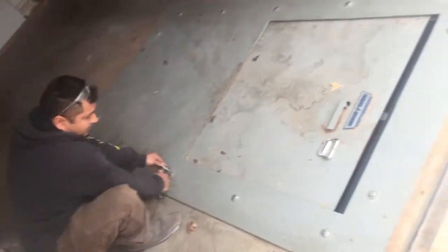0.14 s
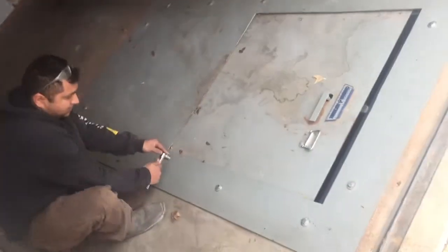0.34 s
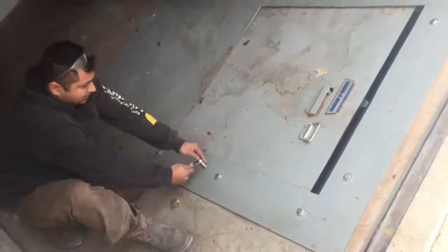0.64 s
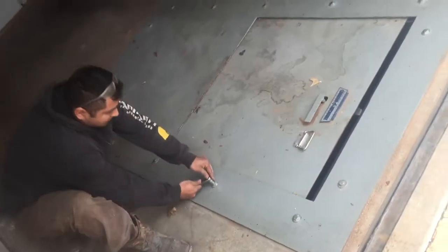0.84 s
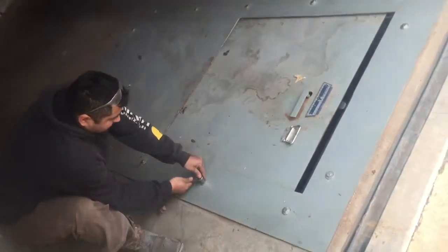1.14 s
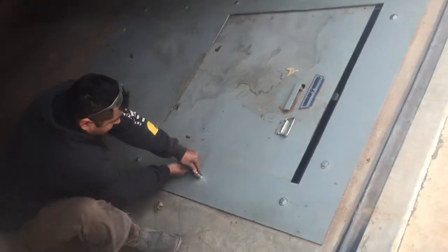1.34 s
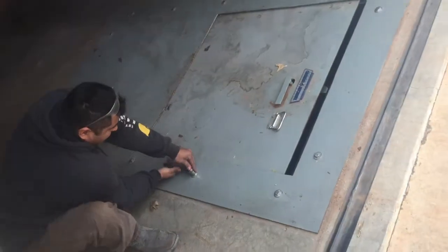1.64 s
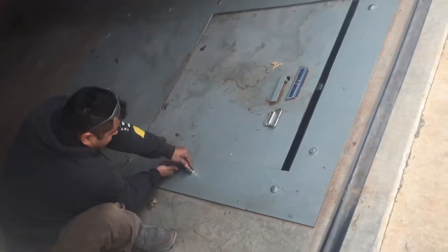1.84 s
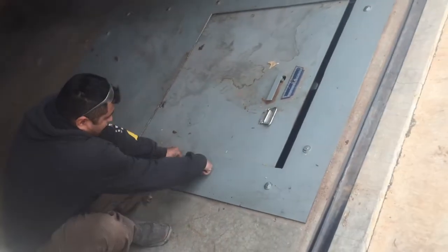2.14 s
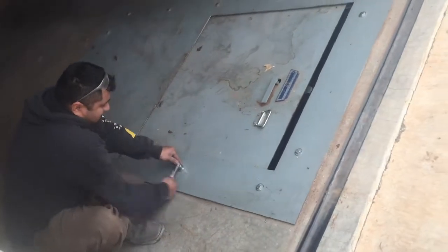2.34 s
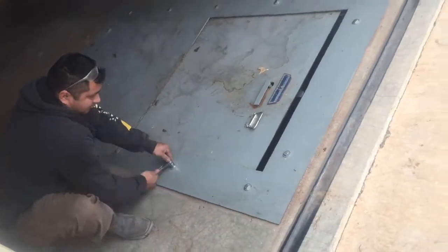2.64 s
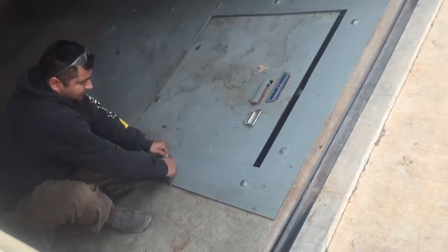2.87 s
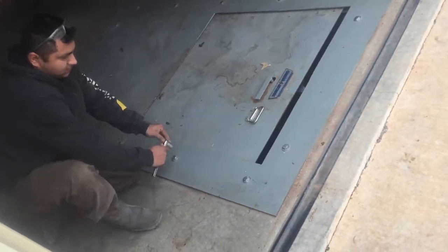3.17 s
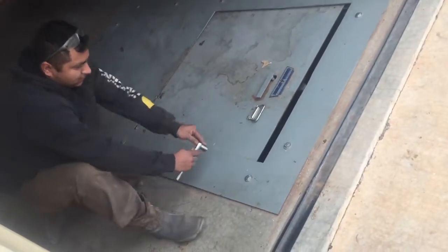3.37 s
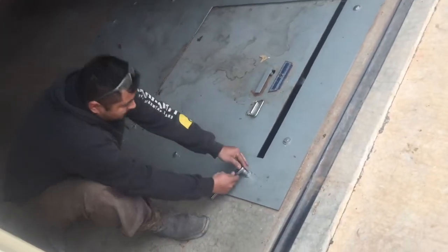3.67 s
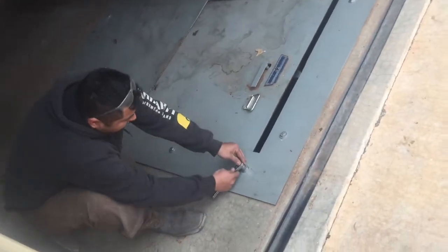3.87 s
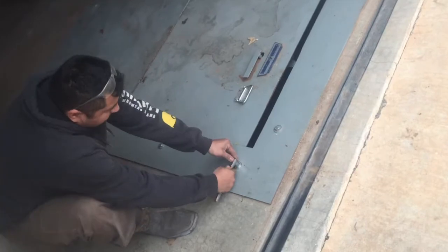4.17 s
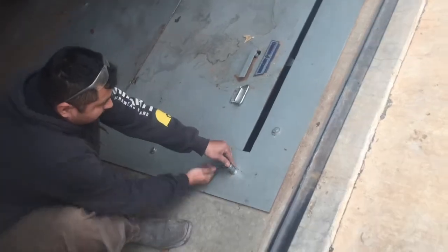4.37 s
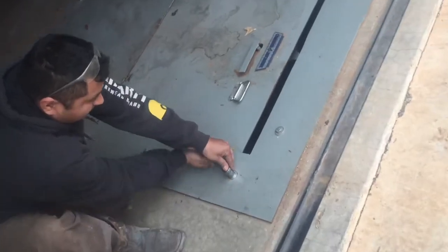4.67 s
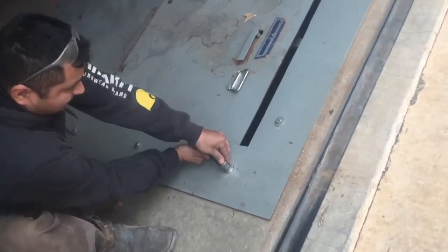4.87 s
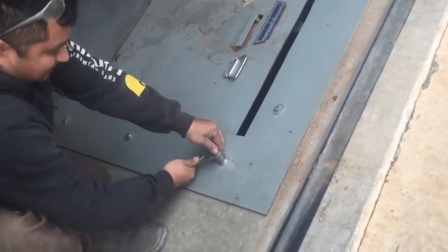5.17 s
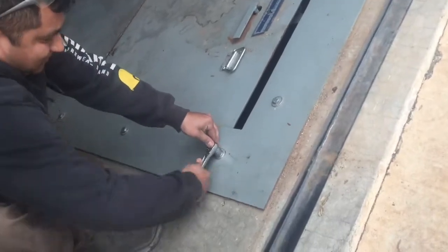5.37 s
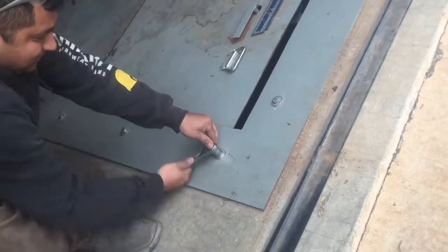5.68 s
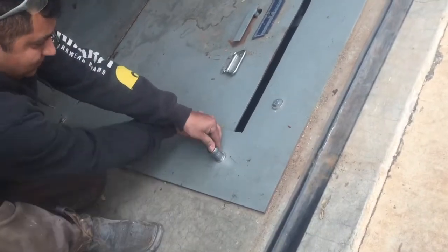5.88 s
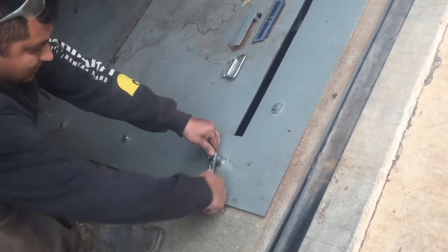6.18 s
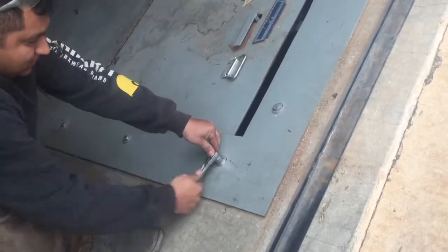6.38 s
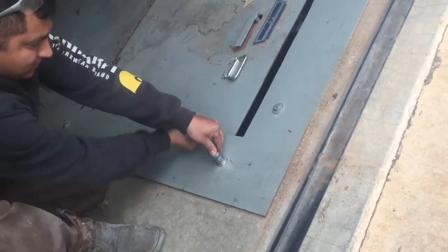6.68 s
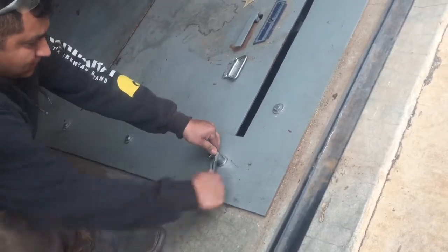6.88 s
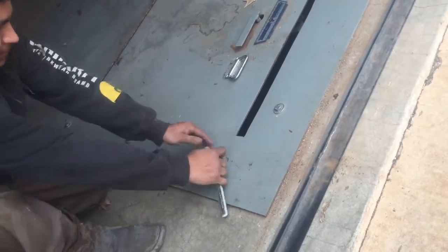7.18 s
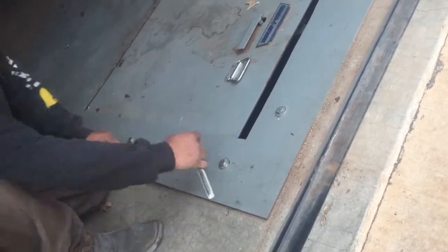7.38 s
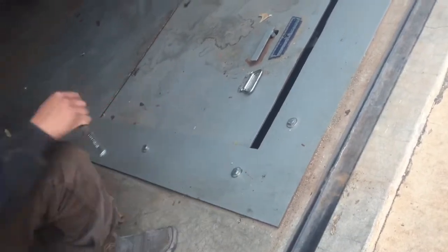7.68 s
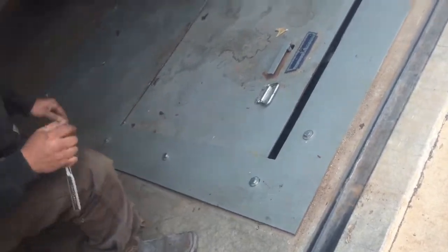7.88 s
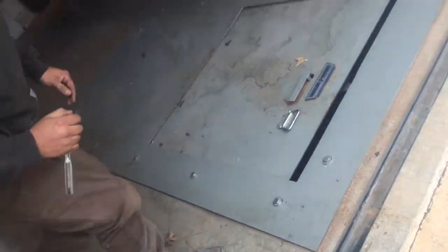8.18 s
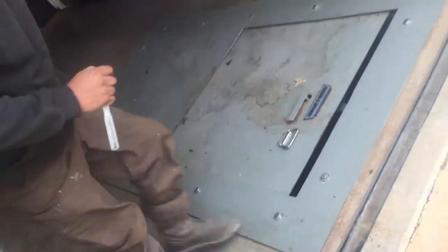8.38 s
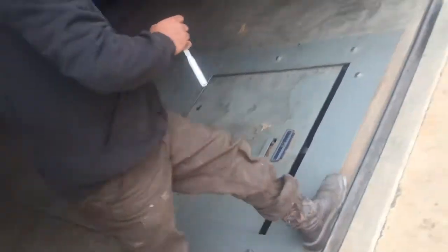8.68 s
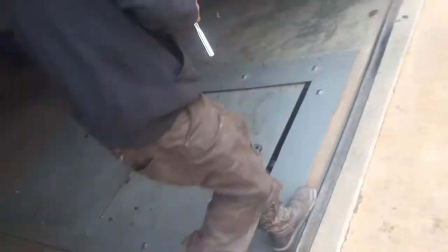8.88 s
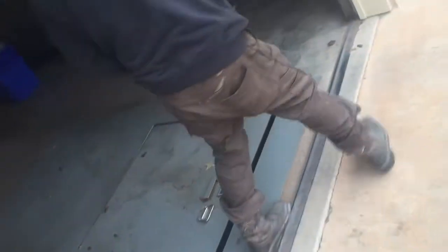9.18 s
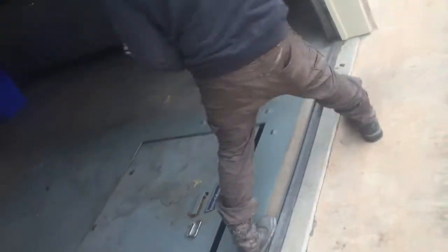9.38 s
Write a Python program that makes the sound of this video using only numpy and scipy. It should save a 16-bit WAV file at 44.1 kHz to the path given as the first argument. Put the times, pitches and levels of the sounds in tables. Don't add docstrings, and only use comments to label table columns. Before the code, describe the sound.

In a bare, echoing garage, a socket clanks on steel plate, a ratchet ticks rapidly, tight threads screech and squeal, and boots crunch grit.

```python
import sys
import numpy as np
from scipy import signal
from scipy.fft import rfft, irfft, next_fast_len
from scipy.io import wavfile
from scipy.ndimage import uniform_filter1d, map_coordinates

SR = 44100
rng = np.random.default_rng(int(sys.argv[2]) if len(sys.argv) > 2 else 0)


def volts_from_db(level):
    exponent = np.asarray(level, float) / 20
    return 10 ** exponent


def to_wav(sig):
    pcm = np.clip(np.atleast_2d(sig), -1, 1) * 32767
    pcm = np.round(pcm).astype(np.int16)
    wavfile.write(sys.argv[1], SR, pcm.T)


N = 419832

# freq_hz, density_db
STEEL_COLOUR = [(180, -52), (300, -19), (624, -12.5), (870, -16), (994, -10.5), (1230, -10.5), (1460, -11),
                (1580, -6), (2480, 0.5), (3240, -2.5), (4520, 1.5), (5700, -7), (11300, -41.5),
                (16000, -44.5)]
# freq_hz, level_db
EDGE_COLOUR = [(4500, -50.5), (6500, -4), (10000, -3), (15800, -21)]


def unit(x):
    return x / np.sqrt(np.mean(x ** 2) + 1e-20)


def along(points, hz):
    f, v = np.transpose(points)
    return np.interp(np.log(hz + 1), np.log(f + 1), v)


def curves(rows):
    s, *cols = np.transpose(rows)
    return [np.interp(np.arange(N) / SR, s, c) for c in cols]


def wobble(rate, size=N):
    knots = rng.standard_normal(int(size * rate / SR) + 4)
    return map_coordinates(knots, [np.arange(size) * rate / SR])


def filtered(x, response):
    m = next_fast_len(N + SR // 2)
    return irfft(rfft(x, m) * response(np.fft.rfftfreq(m, 1 / SR)), m)[:N]


def resonance(f, hz, width):
    return 1j * f * width / (hz * hz - f * f + 1j * f * width)


def modes(x, table):
    def response(f):
        return sum((-1) ** k * volts_from_db(db) * resonance(f, hz, width) for k, (hz, width, db) in enumerate(table))
    return filtered(x, response)


def rush(spectrum, patchy_db):
    z = signal.stft(rng.standard_normal(N), nperseg=512)[2]
    field = uniform_filter1d(rng.standard_normal(z.shape), 6, 0)
    field = uniform_filter1d(field, 10, 1)
    noise = signal.istft(z * volts_from_db(patchy_db * unit(field)), nperseg=512)[1][:N]
    return unit(filtered(noise, lambda hz: volts_from_db(along(spectrum, hz))))


def threads():
    # time_s, slip_rate_hz, level_db
    chirp = [(1.985, 1374, -32), (1.992, 1377, -18.5), (1.998, 1269, -21), (2.01, 1268, -17),
             (2.021, 1300, -64)]
    screech = [(5.136, 500.2, -26.5), (5.158, 482.2, -17.5), (5.179, 484.8, -14.5), (5.2, 496.3, -16),
               (5.233, 490.3, -19.5), (5.249, 490, -27), (5.351, 487, -60)]
    groan = [(5.356, 1284, -51.5), (5.368, 1273, -25.5), (5.41, 1284, -28.5), (5.432, 1289, -29),
             (5.445, 1260, -31.5)]
    yelp = [(5.44, 1210, -45), (5.45, 1202, -17), (5.461, 1209, -15), (5.466, 1211, -23),
            (5.478, 1235, -21), (5.484, 1220, -53)]
    squeak = [(5.464, 1291, -43), (5.472, 1310, -16), (5.494, 1304, -12.5), (5.513, 1321, -19),
              (5.526, 1307, -29), (5.54, 1316, -58)]
    squeal = [(6.095, 1386, -44), (6.112, 1429, -29), (6.128, 1384, -19), (6.145, 1391, -14.5),
              (6.189, 1391, -20.5), (6.208, 1422, -22.5), (6.245, 1408, -34.5), (6.37, 1402, -37),
              (6.41, 1366, -52)]
    whistle = [(6.165, 1325, -60), (6.175, 1327, -39), (6.21, 1327, -38), (6.24, 1325, -55)]
    slip_names = ["chirp", "screech", "groan", "yelp", "squeak", "squeal", "whistle"]
    # full_slip_db, share of the level swing followed, edge_db
    grinding = [
        (-24, 0.45, -14.5),
        (-14, 0.67, -19),
        (-24.5, 0.44, -25),
        (-22, .45, -21.5),
        (-22, 0.31, -21.5),
        (-38, 0.73, -21),
        (-43, 0.26, -21.5),
    ]
    # multiple, level_db
    voices = [
        [(1, -4), (2, 0), (3, -2), (4, -3), (5, -14), (6, -24), (7, -27)],
        [(1, -27), (2, -14), (3, -2), (4, -4), (5, -1), (6, -5), (7, -9), (8, -1), (9, 0), (10, -5), (11, -13),
         (12, -19)],
        [(1, -20), (2, 0), (3, -4), (4, -7), (5, -16), (6, -29)],
        [(1, -21), (2, -6), (3, 0), (4, -3), (5, -19), (6, -35), (7, -33), (8, -38)],
        [(1, -19), (2, -11), (3, 0), (4, -13), (5, -22), (6, -40), (7, -38), (8, -41), (9, -42)],
        [(1, -7.5), (2, 0), (3, -12), (4, -29), (5, -39), (6, -38), (7, -38), (8, -41), (9, -50), (10, -46),
         (11, -54)],
        [(3.85, 2), (4.9, -12), (6, -11), (7, -5), (8, -8), (9, -12), (10, -12), (11, -18)],
    ]
    wavers = [.015, .017, .014, .005, .005, .003, .003]
    # freq_hz, level_db
    rasp = [(300, -8.5), (800, -3), (1300, -2.7), (6000, -0.7), (9000, 2)]
    out = np.zeros(N)
    grit = rush([(hz, db + along(rasp, hz)) for hz, db in STEEL_COLOUR], patchy_db=5.5) * volts_from_db(1.3 * wobble(300))
    edge = rush(EDGE_COLOUR, patchy_db=-5.0) * volts_from_db(2.2 * wobble(250))
    slips = [chirp, screech, groan, yelp, squeak, squeal, whistle]
    for rows, (full_db, share, edge_db), voice, waver in zip(slips, grinding, voices, wavers):
        a, b = round(rows[0][0] * SR), round(rows[-1][0] * SR)
        rate_hz, level_db = (c[a:b] for c in curves(rows))
        grind_db = full_db + share * (level_db - level_db.max())
        phase = 2 * np.pi * np.cumsum(rate_hz * (1 + waver * wobble(600, size=b - a))) / SR
        flutter_db = 1 + 150 * waver
        tone = np.zeros(b - a)
        for multiple, db in voice:
            gain = volts_from_db(db + flutter_db * wobble(100, size=b - a))
            tone += gain * np.sin(multiple * phase + rng.uniform(0, 2 * np.pi))
        out[a:b] += volts_from_db(level_db) * unit(tone)
        out[a:b] += volts_from_db(grind_db) * (grit[a:b] + volts_from_db(edge_db) * edge[a:b])
    return out


def ratchet():
    # start_s, bright_db, body_db
    teeth = [(0.123, -47, -35), (0.158, -60, -42), (0.2007, -58, -56), (1.3629, -54, -37),
             (1.3984, -57, -32), (1.4268, -54, -36), (1.4619, -54, -31), (2.3853, -57, -44),
             (2.4014, -56, -37), (2.4161, -58, -34), (2.4309, -55, -32), (2.4455, -52, -33),
             (2.4606, -49, -37), (2.4765, -56, -40), (2.4924, -52, -30), (2.5078, -50, -38),
             (2.5244, -47, -30), (2.5426, -49, -41), (2.5611, -48, -34), (2.5889, -53, -31),
             (2.619, -52, -35), (4.3478, -55, -37), (4.3749, -52, -41), (4.3978, -55, -37),
             (4.426, -47, -30), (4.4537, -49, -51), (4.4815, -47, -41), (4.5062, -53, -35),
             (4.5272, -46, -33), (4.5495, -50, -38), (4.5753, -52, -39), (5.7037, -54, -40),
             (5.7202, -54, -41), (5.7364, -48, -41), (5.7527, -50, -43), (5.7688, -50, -37),
             (5.7857, -48, -43), (5.8024, -50, -45), (5.8217, -54, -39), (5.8404, -53, -37),
             (5.8581, -48, -36), (5.8753, -52, -28), (5.8932, -50, -33), (6.4773, -47, -33),
             (6.4919, -45, -34), (6.5051, -43, -31), (6.5182, -49, -35), (6.5312, -45, -31),
             (6.5455, -44, -31), (6.5614, -45, -31), (6.5791, -52, -31), (6.5961, -48, -28),
             (6.613, -41, -29), (6.6314, -49, -40), (6.6493, -50, -33), (6.6687, -51, -43),
             (6.691, -58, -39), (6.7342, -69, -39)]
    # freq_hz, width_hz, level_db
    pawl_modes = [(5900, 320, -7), (8850, 340, 11), (11530, 1100, 0), (13000, 1400, 0.5), (14860, 1500, -2)]
    # freq_hz, width_hz, level_db
    head_modes = [(1886, 1100, -8.5), (2850, 1000, -4), (4510, 500, -4.5)]
    bright, body, click = np.zeros(N), np.zeros(N), np.zeros(N)
    t = np.arange(400) / SR
    u = t / 0.0012
    for s, db, body_db in teeth:
        now = slice(round(s * SR), round(s * SR) + len(t))
        grit = rng.standard_normal((2, len(t))) * volts_from_db(-60 * t / 0.0099) * (1 - np.exp(-t / 0.00064))
        click_hz = 4400 * (1 + 0.04 * rng.standard_normal())
        bright[now] += volts_from_db(db - 8.0) * unit(grit[0])
        body[now] += volts_from_db(body_db - 0.5) * unit(grit[1])
        click[now] += volts_from_db(body_db + 1.5) * u * np.exp(1 - u) * np.sin(2 * np.pi * click_hz * t)
    return modes(bright, pawl_modes), modes(body, head_modes), click


def blows(events, ring_db, rise_ms, ms, crack_db):
    # freq_hz, level_db
    blow_band = [(300, -25), (900, -6.5), (1300, 5.5), (5000, -2), (7000, -15.5), (12000, -28)]
    # freq_hz, level_db
    thud_colour = [(40, -46.5), (100, 1.5), (350, -2.5), (800, 1), (1500, -41)]
    direct, sent = np.zeros(N + SR), np.zeros(N + SR)
    core = [(hz, db + along(blow_band, hz)) for hz, db in STEEL_COLOUR]
    steel, thud = rush(core, patchy_db=2.0), rush(thud_colour, patchy_db=-1.5)
    edge = rush(EDGE_COLOUR, patchy_db=-2)
    hz, t = np.fft.rfftfreq(1024, 1 / SR), np.arange(SR // 5) / SR
    pulses = [np.roll(irfft(volts_from_db(along(colour, hz))), 128) for colour in (core, thud_colour, EDGE_COLOUR)]
    core_pulse, thud_pulse, edge_pulse = [p / np.linalg.norm(p) for p in pulses]
    t60 = ms / 1000
    fall = volts_from_db(-60 * t / t60) * (1 - np.exp(-t * 1000 / rise_ms))
    low_fall = volts_from_db(-60 * t / (t60 + 0.025)) * (1 - np.exp(-t / 0.0012))
    for s, db, ring_hz, thud_db, edge_db in events:
        start = round(s * SR)
        i = min(start, N - len(t))
        thud_db = thud_db + 3.0
        partials = 1 + 0.038 * rng.standard_normal(3)
        ring = sum(np.sin(2 * np.pi * ring_hz * k * t) for k in partials) * fall
        rattle = (steel[i:][:len(t)] + volts_from_db(edge_db) * edge[i:][:len(t)]) * fall
        low = volts_from_db(thud_db) * thud[i:][:len(t)] * low_fall
        direct[start:][:len(t)] += volts_from_db(db - 8.0) * (rattle + volts_from_db(ring_db) * ring + low)
        first_contact = core_pulse + volts_from_db(edge_db) * edge_pulse
        direct[start - 110:][:1024] += volts_from_db(db + crack_db) * first_contact

        broad = np.sin(2 * np.pi * ring_hz * t[:1024]) * volts_from_db(-60 * t[:1024] / 0.02)
        smooth = core_pulse + volts_from_db(thud_db) * thud_pulse + volts_from_db(edge_db - 2) * edge_pulse
        smooth = smooth + volts_from_db(-4.0) * broad / np.linalg.norm(broad)
        sent[start:][:1024] += volts_from_db(db - 11.5) * np.linalg.norm(fall) * smooth
    return direct[:N], sent[:N]


def lid():
    # start_s, freq_hz, level_db, t60_s
    lid_modes = [(1.988, 1388, -31, 0.5), (3.42, 249, -40.5, 0.1), (3.42, 178, -47, 0.26),
                 (3.62, 279, -50, 0.21), (3.55, 188, -46.5, 0.42), (1.33, 605, -50, 0.45),
                 (4.15, 635, -43, 0.4), (5.23, 600, -37.5, 0.41), (5.37, 619, -43, 0.34),
                 (7.1, 695, -47.5, 0.66), (7.22, 251.2, -48.5, 0.97), (7.24, 420, -52.5, 0.54),
                 (7.685, 1100, -57, .12), (7.71, 1420, -56, 0.14), (8.01, 860, -59, 0.29),
                 (7.76, 880, -62, 0.33), (8.28, 860, -64, 0.53)]
    out, t = np.zeros(N + SR), np.arange(SR // 2) / SR
    for s, hz, db, t60 in lid_modes:
        swell = volts_from_db(db - 60 * t / t60 + 3.0 * wobble(27, size=len(t))) * (1 - np.exp(-t / 0.0014))
        phase = 2 * np.pi * hz * np.cumsum(1 + 0.0088 * wobble(40, size=len(t))) / SR
        out[round(s * SR):][:len(t)] += swell * np.sin(phase)
    return out[:N]


def garage(x, count=32):
    # freq_hz, t60_s
    decay = [(200, 0.91), (1000, 0.59), (3000, 0.61), (6000, 0.67), (9000, 0.53), (14000, 0.42)]
    # freq_hz, level_db
    wall_colour = [(100, -5), (500, -2), (1500, 0.5), (5000, -2), (8000, -2), (16000, -14)]
    hz, t, z = signal.stft(rng.standard_normal((count + 1, SR)), SR, nperseg=256)
    shape = along(wall_colour, hz)[:, None] - 60 * t / along(decay, hz)[:, None]
    tails = signal.istft(z * volts_from_db(shape), SR, nperseg=256)[1][:, :SR]
    tails = tails * (1 - np.exp(-(np.arange(SR) / SR / 0.006) ** 2))
    step = N // count + 1
    padded = np.pad(x, (step, 2 * step))
    parts = np.array([padded[k * step:][:2 * step] for k in range(count + 1)]) * np.hanning(2 * step)
    wet = signal.fftconvolve(parts, tails / np.linalg.norm(tails[0]), axes=1)
    out = np.zeros(step * count + wet.shape[1])
    for k in range(count + 1):
        out[k * step:][:wet.shape[1]] += wet[k]
    return out[step:][:N]


def clothes():
    # time_s, rustle_db
    movement = [(0, -43), (.5, -60), (.92, -57), (1.65, -70), (1.9, -70), (2, -44.5), (2.65, -49),
                (3.08, -62.5), (3.6, -90), (3.79, -51), (4.78, -56), (4.98, -74.5), (5.6, -67), (6.46, -44),
                (6.75, -47.5), (8.1, -68.5), (8.43, -60), (8.45, -53)]
    # freq_hz, density_db
    cloth_colour = [(290, -37.5), (500, -14), (677, -21), (938, -1.5), (1110, 4.5), (1980, 2.5), (2440, 3),
                    (2780, -10), (4300, 9.5), (5970, -17.5), (9000, -46.5), (11700, -67.5), (19800, -120)]
    rustle_db, = curves(movement)
    return volts_from_db(rustle_db - 4.5 + 0.5 * wobble(22)) * rush(cloth_colour, patchy_db=4.5)


def lid_hum():
    # centre_s, length_s, level_db
    leans = [(0, 0.26, -55.5), (.82, 0.3, -60), (2.2, 0.32, -68), (2.95, 0.16, -65), (3.55, 0.14, -59),
             (4.27, 0.14, -66.5), (5.5, 0.068, -65), (6, 0.19, -61.5), (6.6, 0.44, -62), (7.12, 0.17, -51),
             (8.7, 0.23, -66), (9.25, 0.3, -55.5)]
    # freq_hz, density_db
    hum_colour = [(76, -43.5), (130, -9), (259, 1.5), (361, -5.5), (572, -14.5), (706, -18.5), (900, -11),
                  (1170, -53), (1980, -120)]
    t = np.arange(N) / SR
    weight = volts_from_db(-73.5)
    for s, length, db in leans:
        weight = weight + volts_from_db(db) * np.exp(-((t - s) / length) ** 2)
    return weight * volts_from_db(2 * wobble(8.5)) * rush(hum_colour, patchy_db=2.5)


def air():
    # time_s, rumble_db
    air_level = [(0, -62), (.21, -53.5), (.45, -65), (.82, -58.5), (1.1, -61.5), (1.8, -59.5), (2.6, -57.5),
                 (3.18, -55.5), (3.39, -63), (3.61, -48), (3.95, -59.5), (4.45, -52.5), (5.1, -62.5),
                 (5.65, -61.5), (6.8, -58.5), (7.5, -51), (8.5, -60), (9.1, -53)]
    # freq_hz, density_db
    air_colour = [(12, -58), (20, -24.5), (49, -2.5), (76, -2), (93, -5.5), (150, -17.5), (200, -21.5),
                  (260, -51), (440, -120)]
    rumble_db, = curves(air_level)
    return volts_from_db(rumble_db + 2.0 + 1.7 * wobble(11)) * rush(air_colour, patchy_db=2.0)


def hiss():
    # freq_hz, density_db
    hiss_colour = [(350, -48), (600, -17), (846, -2.5), (1050, -8), (1590, -8.5), (2760, -17.5),
                   (4280, -17), (6460, -27.5), (16000, -31)]
    return volts_from_db(-70.0) * rush(hiss_colour, patchy_db=2.0)


def scene():
    # start_s, peak_db, ring_hz, thud_db, edge_db
    knock_events = [(0.9267, -14.5, 2780, -60, -24), (0.9493, -19.5, 2540, -49, -18),
                    (1.2707, -15.5, 4170, -62, -28), (1.2766, -17, 4400, -30, -22.5),
                    (1.3159, -14.5, 2044, -19.5, -36), (1.979, -11, 4530, -64.5, -14.5),
                    (3.7968, -11.5, 4150, -53, -30), (3.8096, -12.5, 4000, -47, -20.5),
                    (4.1455, -3.5, 4120, -27, -26), (4.1582, -20, 3920, -42, -32),
                    (5.138, -1, 4290, -24.5, -27.5), (5.677, -21, 2990, -17.5, -32),
                    (6.063, -27.5, 3250, -7.5, -31), (6.0741, -16.5, 3310, -19, -24.5),
                    (6.092, -18, 2890, -37, -24), (7.0986, -18.5, 2660, -35, -26.5)]
    # start_s, peak_db, ring_hz, thud_db, edge_db
    scuff_events = [(0.0813, -33.5, 1787, -14, -24), (0.6437, -48, 6800, -25, -40),
                    (8.1, -59.5, 4200, -42, -39.5), (8.165, -53, 4500, -40, -40), (.2, -45, 3950, -40, -42),
                    (0.64, -48, 3900, -40, -40), (.86, -43, 2620, -40, -40), (2.785, -36, 2670, -40, -45),
                    (2.5, -47, 700, -18, -45), (2.722, -34, 1900, -20, -52), (3.053, -39.5, 1600, -40, -19),
                    (3.243, -45, 4300, -35, -33), (3.3, -39, 4300, -29, -34),
                    (4.132, -29.5, 4250, -26, -17.5), (5.118, -41, 3400, -31, -38.5),
                    (4.798, -39.5, 1640, -17, -46.5), (4.82, -42, 3100, -29.5, -44.5),
                    (2, -45, 1800, -3, -40), (1.205, -44.5, 4300, -35, -40),
                    (6.8029, -26.5, 1760, -11, -57), (7.5198, -40.5, 4560, -19, -46),
                    (7.705, -46, 4300, -18, -32), (7.6, -50, 4340, -30, -40), (8.7575, -25, 4240, -21, -28),
                    (9.399, -40.5, 1300, -27, -14)]
    # start_s, peak_db, ring_hz, thud_db, edge_db
    tap_events = [(0.2974, -44, 3920, -9, -48), (.576, -52, 5500, -40, -15), (1.9103, -40, 2300, -42, -45),
                  (1.9353, -36, 2450, -40, -45), (1.9437, -45, 2450, -40, -45),
                  (1.967, -37, 2470, -36, -45), (2.9078, -36.5, 3100, -25, -42),
                  (3.018, -36.5, 2380, -31, -34.5), (3.4171, -30, 2440, -4.5, -45),
                  (3.5434, -31.5, 1150, -29.5, -42), (3.5994, -73, 1480, 1, -19),
                  (7.154, -26, 4020, -26, -32), (7.206, -29, 2760, -6, -45), (7.2557, -24, 3140, -49, -21),
                  (7.3024, -22.5, 4300, -32, -20.5), (7.3994, -42, 4220, -17, -31)]
    # start_s, peak_db, ring_hz, thud_db, edge_db
    grit_events = [(8.3491, -36.5, 1766, -31, -33), (8.3816, -37, 3940, -13.5, -40.5),
                   (8.487, -38.5, 1960, -4.5, -32), (8.569, -50, 800, 9.5, -42),
                   (8.636, -50.5, 800, 7, -40), (8.711, -54, 1793, 2, -40), (8.7665, -20, 4300, -37, -35),
                   (8.777, -18.5, 2270, -37, -24), (8.789, -19, 4160, -44, -29),
                   (8.8169, -25, 4230, -23, -48), (8.834, -26.5, 4030, -11.5, -39.5),
                   (8.866, -31, 4330, -21, -49), (8.888, -32, 4130, -23, -45),
                   (9.3026, -31.5, 4300, -3, -30), (9.3225, -17, 2750, -2.5, -34),
                   (9.3355, -25, 3330, -10, -38), (9.422, -35, 4360, -25, -35),
                   (9.5055, -40, 4300, -15, -31)]
    slips = threads()
    pawl, head, click = ratchet()
    knocks, far_knocks = blows(knock_events, ring_db=-3.5, rise_ms=0.91, ms=56.2, crack_db=2.0)
    scuffs, far_scuffs = blows(scuff_events, ring_db=-5.0, rise_ms=7.4, ms=95, crack_db=-24.5)
    taps, far_taps = blows(tap_events, ring_db=-3.5, rise_ms=0.21, ms=15, crack_db=-11.0)
    grit, far_grit = blows(grit_events, ring_db=-6.5, rise_ms=0.27, ms=17, crack_db=0.0)

    to_walls = volts_from_db(0.5) * far_knocks + volts_from_db(3.0) * far_scuffs + volts_from_db(-4.0) * far_taps + volts_from_db(-11.5) * far_grit
    to_walls += volts_from_db(-2.5) * pawl + volts_from_db(4.0) * head + volts_from_db(-7.0) * click + volts_from_db(-7.0) * slips
    direct = knocks + scuffs + taps + grit + pawl + head + click + slips + lid()
    background = clothes() + lid_hum() + air() + hiss()
    return (direct + garage(to_walls) + background)[None]


def top_cut(x):
    return signal.sosfilt(signal.butter(12, 16480, fs=SR, output="sos"), x)


def record(dry):
    limited = dry[0] / (1 + np.abs(dry[0] / 0.57) ** 8) ** (1 / 8)
    mix = filtered(limited, lambda hz: volts_from_db(np.interp(hz, [15900, 16000], [0, -22])))
    return top_cut(mix[None])


dry = scene()
out = record(dry)
to_wav(out)
```